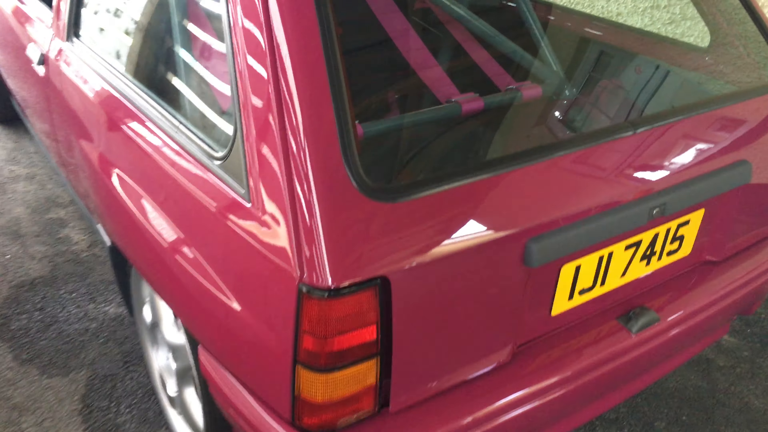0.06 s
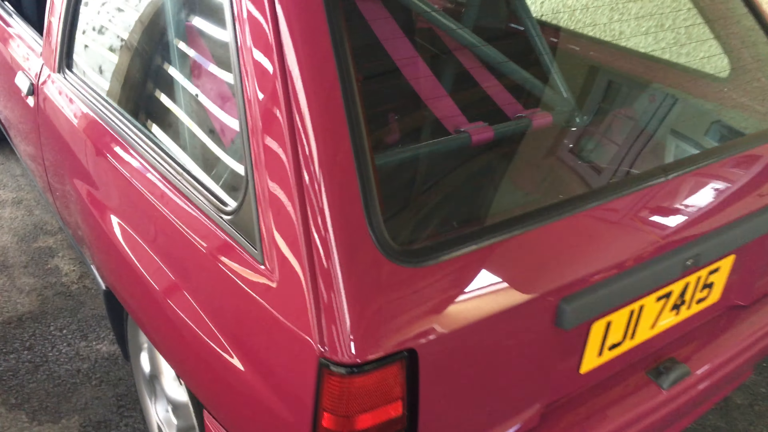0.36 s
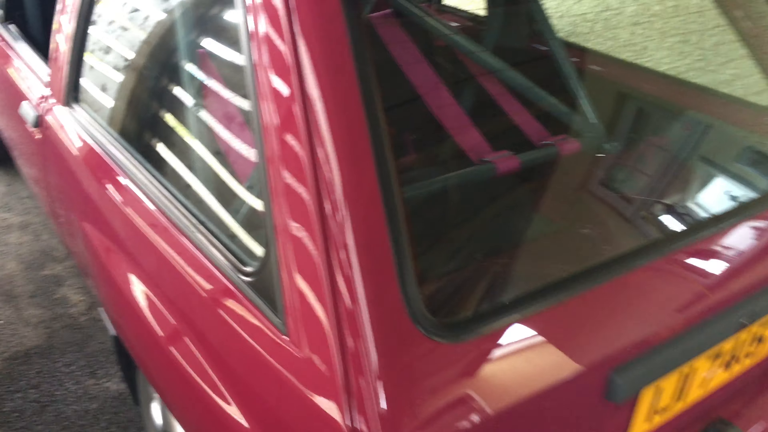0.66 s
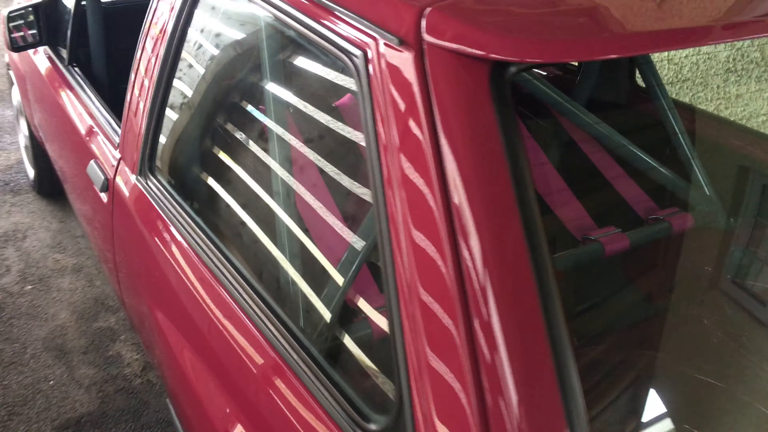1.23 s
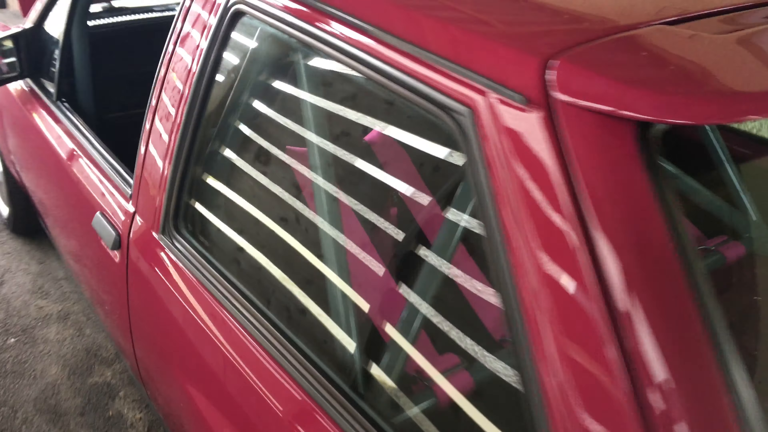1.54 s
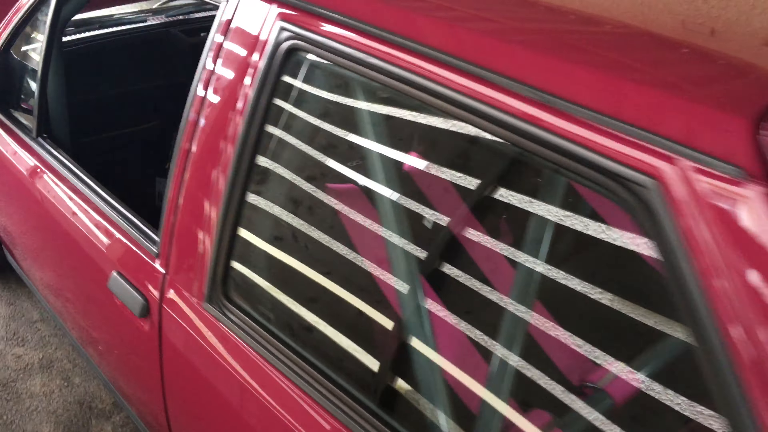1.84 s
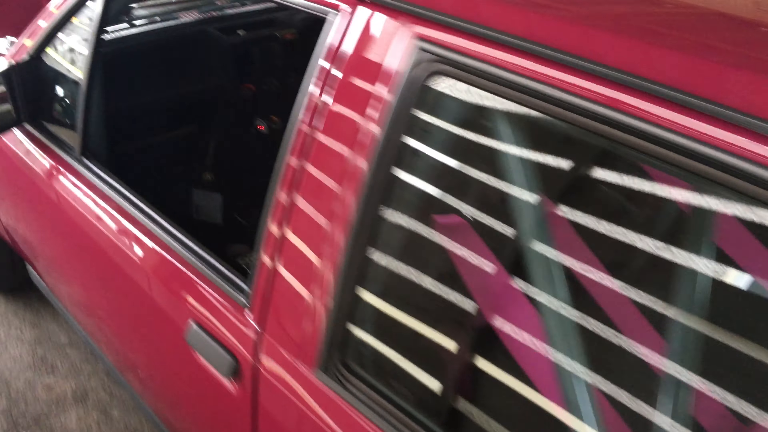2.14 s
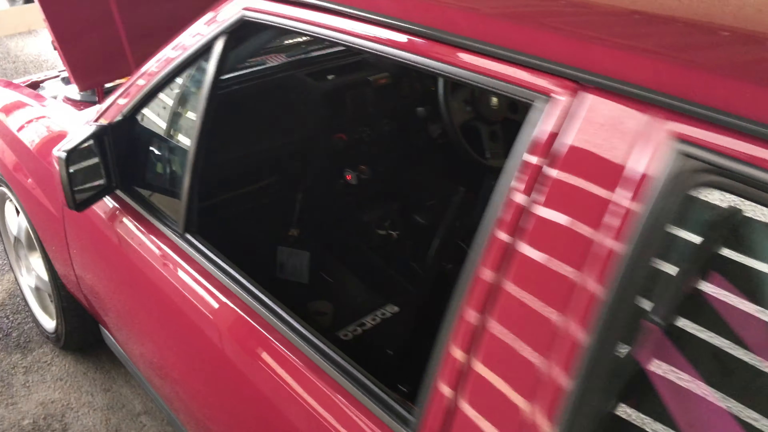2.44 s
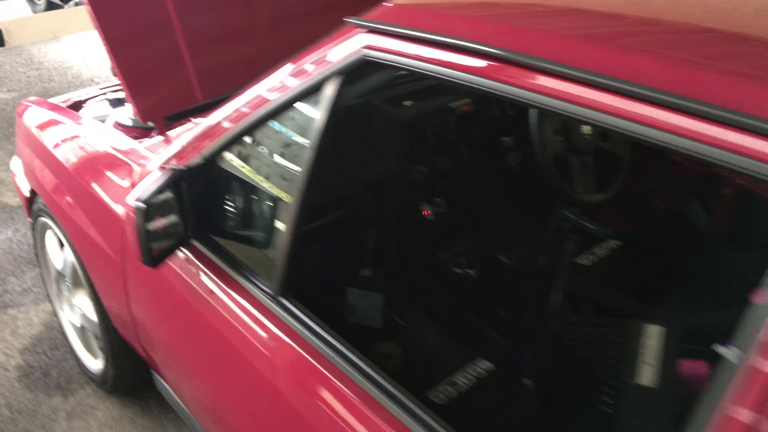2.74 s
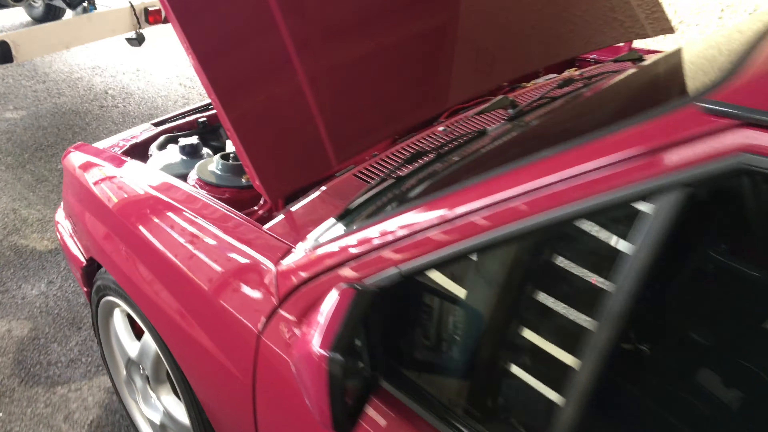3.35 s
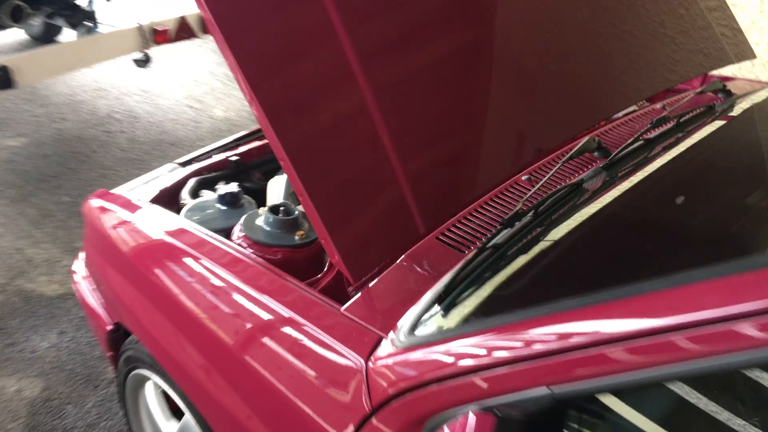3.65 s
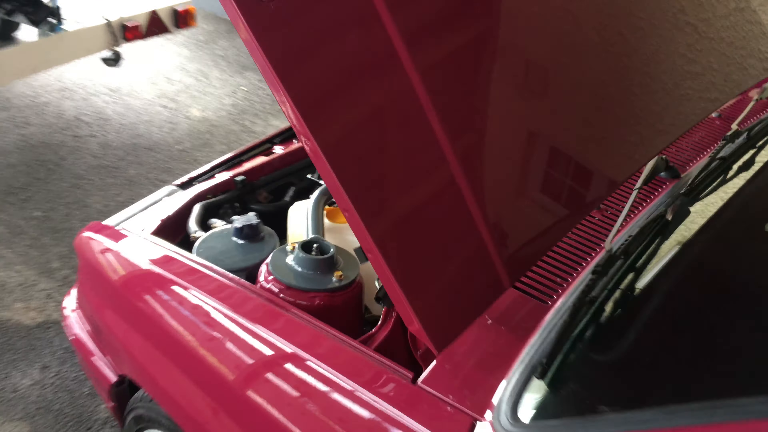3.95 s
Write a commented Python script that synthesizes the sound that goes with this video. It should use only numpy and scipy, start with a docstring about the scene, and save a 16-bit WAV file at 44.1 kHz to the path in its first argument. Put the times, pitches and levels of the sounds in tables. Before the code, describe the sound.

A four-cylinder petrol car idles in a garage, droning and chuffing unevenly over a rumble and faint valve ticks. The microphone travels from rear to engine bay, where the cooling fan's whirr and a belt whine come forward.

```python
"""A garage, where a four-cylinder petrol engine idles, hunting slowly, with its radiator fan running.
The exhaust drones on the firing rate, and uneven firings make the pipe chuff and burble.
Behind it the block rumbles, the valves tick, a belt drive whines and the fan blades chop the air.
We walk from the tailpipe to the open bonnet: the drone thins, the fan's whine and rush grow."""
import sys
import numpy as np
from scipy import signal
from scipy.fft import rfft, irfft, next_fast_len
from scipy.io import wavfile
from scipy.ndimage import uniform_filter1d, map_coordinates

SR = 44100
rng = np.random.default_rng(int(sys.argv[2]) if len(sys.argv) > 2 else 0)


def store_pcm(level_fs):
    """Save levels as 16-bit WAV."""
    pcm = np.round(np.clip(level_fs, -1, 1) * 32767).astype(np.int16)
    wavfile.write(sys.argv[1], SR, np.atleast_2d(pcm).T)


N = 176400

# narrow swells in the rush (time [s], pitch [Hz], length [s], level [dB], half-width [ratio])
WHIRR_SWELLS = [(.36, 1705, .14, -42, .024), (2.54, 930, 0.29, -43, 0.0076),
                (3.351, 1588, 0.25, -38.5, .022)]
# thin ring from the engine bay, likely a bearing (pitch [Hz], relative level [dB])
BEARING_TONES = [(4226, 0.5), (4608, 0.5), (5033, -5), (5410, 1)]
# fader for that ring (time [s], level [dB])
BEARING_FADER = [(0, -72), (3.15, -66), (3.38, -59), (3.62, -66), (4, -64)]
# belt-driven whine, likely the alternator (time [s], level [dB])
ALTERNATOR_FADER = [(0, -47.5), (.8, -56), (1.1, -46), (1.5, -47), (1.7, -53), (1.92, -40.5), (2.2, -51),
                    (2.75, -46), (3.2, -55), (3.45, -48), (3.56, -39.5), (3.78, -41), (4, -52)]
# colour of the block's rumble (frequency [Hz], gain [dB])
RUMBLE_EQ = [(15, -21), (45, 3), (62, 12), (76, 3.5), (92, 14.5), (112, 4), (160, 5.5), (240, -2.5),
             (355, -1.5), (430, -11.5), (700, -20), (1200, -49.5)]
# rumble along the walk (time [s], level [dB])
RUMBLE_FADER = [(0, -30.5), (1.3, -27.5), (1.8, -32), (2.9, -30.5), (4, -31.5)]
# colour of the valve ticks (frequency [Hz], gain [dB])
TICK_EQ = [(600, -26), (1200, 0), (2000, 0), (3200, -10), (7000, -27.5), (14000, -36)]
# pace of the fan shaft (time [s], speed [turns/s])
FAN_SHAFT = [(0, 38), (1, 38), (2, 38.3), (3.3, 38.46), (4, 38.6)]
# blade harmonics 1, 3, 4 and 5 (pitch [multiple of shaft speed])
BLADE_MULTIPLES = [10, 30, 40, 50]
# blade whine along the walk (time [s], then for each blade harmonic: level [dB])
BLADE_FADERS = [(0, -52, -54, -55, -55), (0.45, -50.5, -43, -40.5, -56), (0.85, -48.5, -49, -60, -45.5),
                (1.2, -50, -50, -49, -52.5), (1.6, -48, -39.5, -52, -41.5), (2.0, -49, -46.5, -44.5, -55),
                (2.35, -48, -38.5, -44, -49), (2.7, -37.5, -51, -43, -52), (3.0, -45, -35.5, -45.5, -38.5),
                (3.35, -44.5, -45.5, -40.5, -51), (3.65, -45, -38.5, -51, -43), (3.85, -37, -45, -44, -60),
                (4, -41, -51, -47, -58)]
# weaker fan tones (pitch at nominal speed [Hz], mid-walk level [dB])
SHAFT_TONES = [(767, -54), (1880, -49.5), (2342, -65), (3110, -60.5)]
# air rush of fan and belts, before trim (time [s], body level [dB], hiss level [dB])
RUSH_FADERS = [(0.0, -36, -51), (0.44, -35.5, -50.5), (0.6, -36.5, -51.5), (1.19, -36.5, -50),
               (1.57, -35, -49.5), (1.82, -35, -49.5), (2.73, -33.5, -47.5), (2.9, -33.5, -46.5),
               (3.2, -33, -47), (3.6, -33, -45.5), (4.0, -32, -45.5)]
# colour of the rush's body (frequency [Hz], gain [dB])
BODY_EQ = [(260, -25), (450, -13.5), (574, -14.5), (670, -8.5), (876, -7), (1120, -4.5), (1400, -6.5),
           (1520, -4.5), (1790, -6), (1940, -3.5), (2200, -11), (2520, -11), (3140, -23.5), (4080, -54),
           (6910, -120)]
# colour of its hiss (frequency [Hz], gain [dB])
HISS_EQ = [(1500, -28), (2800, -3.5), (3300, 4.5), (3650, 0), (4400, 0.5), (4900, -3.5), (5600, -3),
           (6800, -4.5), (7700, -7.5), (9400, -10), (10400, -17), (11200, -14.5), (13500, -18.5),
           (15700, -24)]
# exhaust pipe resonances (frequency [Hz], width [Hz], gain [dB])
PIPE_MODES = [(88.3, 11.7, 27), (160, 17, -9), (190, 11, -10)]
# uneven firings that make the pipe boom (time [s], peak level of the fundamental [dB])
CHUFF_CUES = [(0.185, -15), (0.282, -15.5), (0.377, -17), (0.452, -17.2), (0.495, -19), (0.716, -18),
              (0.842, -18.7), (1.035, -14.5), (1.12, -16.5), (1.239, -15.5), (1.372, -17), (1.447, -15.4),
              (1.778, -13.5), (2.229, -18.2), (2.289, -23), (2.504, -17.5), (2.59, -18.5), (2.831, -14.1),
              (2.962, -17.8), (3.381, -16)]
# the hunting idle (time [s], rate [firings/s])
FIRING_RATE = [(0.0, 36.62), (0.15, 36.5), (0.45, 38.4), (0.7, 38.3), (1.0, 37.5), (1.25, 36.51), (1.5, 37),
               (1.8, 38), (2.05, 38.5), (2.3, 38), (2.55, 38.2), (2.8, 36.67), (3.05, 36.4), (3.3, 37.1),
               (3.55, 37.8), (3.8, 38.05), (4.0, 38)]
# drone harmonics (pitch [multiple of firing rate])
DRONE_HARMONICS = [1, 2, 3, 4, 5, 6, 8]
# drone along the walk (time [s], then for each harmonic: level [dB])
DRONE_FADERS = [(0, -32, -15.5, -23.5, -27, -38, -31.5, -51.2),
                (0.3, -28.6, -15, -26, -26, -29.5, -35, -40.5),
                (0.65, -26.5, -12.5, -26.6, -26.7, -27, -39.5, -35),
                (1.25, -26, -16.5, -29, -29, -39.5, -33, -42),
                (1.55, -28.7, -15, -29, -29, -36, -39, -44.6),
                (1.85, -28.7, -12, -26, -28.5, -31, -41.5, -55),
                (2.15, -30.2, -13.5, -30, -28.5, -33, -40, -55),
                (2.7, -27.7, -22.0, -24, -37, -33, -42, -51.0),
                (3.6, -31.2, -18, -23, -49, -29.5, -47, -47.2),
                (4, -35, -17.2, -24.5, -39, -28, -39, -49.4)]

FADE_DB = 2  # tones swell and fade through the room's standing waves
TICK_DB, TICK_DECAY_S = -54, 0.0027
FAN_NOMINAL_HZ, FAN_WANDER, FAN_FLUTTER_RAD = 38.31, 0.00078, 0.045
BLADES, CHOP_DEPTH, WHINE_WAVER_DB = 10, 0.05, 1.05
BODY_TRIM_DB, HISS_TRIM_DB = -0.65, 0.48
GARAGE_T60_S, GARAGE_WET_DB = 0.32, -5.5
SILENCER_HZ, TAILPIPE_HZ = 180, 46
BURBLE_DB, BURBLE_JITTER_S = -31, 0.0008
CHUFF_HZ, CHUFF_SWELL_S, CHUFF_OCTAVE_DB = 90.6, 0.021, -20.5
DRONE_WAVER_DB, CYLINDER_SWING_DB, ODD_LAG_RAD = 0.7, 1, 1.0
FIRST_FIRING_S, TOP_HZ = 0.023, 15800


def amp(db):
    """Decibels to gain."""
    return 10 ** (np.asarray(db) / 20)


def unit(x):
    """Scale to rms 1."""
    return x / np.sqrt(np.mean(x ** 2) + 1e-20)


def curves(rows):
    """Automation: one value per sample for each column after the time."""
    times, *columns = np.transpose(rows)
    return [np.interp(np.arange(N) / SR, times, column) for column in columns]


def wobble(rate):
    """A smooth random curve, rate knots a second."""
    return map_coordinates(rng.standard_normal(200), [np.arange(N) * rate / SR], mode="mirror")


def filtered(x, response):
    """Filter x by a complex response of frequency."""
    size = next_fast_len(N + SR // 2)
    return irfft(rfft(x, size) * response(np.fft.rfftfreq(size, 1 / SR)), size)[:N]


def drifting_noise(eq, patchy_db):
    """Coloured noise of rms 1 with drifting patches of gain, as when walking past walls."""
    spectra = signal.stft(rng.standard_normal(N), nperseg=2048)[2]
    patches = uniform_filter1d(rng.standard_normal(spectra.shape), size=5, axis=0)  # across frequency
    patches = uniform_filter1d(patches, size=14, axis=1)  # across time
    noise = signal.istft(spectra * amp(patchy_db * unit(patches)), nperseg=2048)[1][:N]
    hz, db = np.transpose(eq)
    return unit(filtered(noise, lambda f: amp(np.interp(np.log(f + 1), np.log(hz), db))))


def garage(x):
    """The sound with the short boom of the walls after it."""
    t = np.arange(SR // 2) / SR
    tail = rng.standard_normal(len(t)) * amp(-60 * t / GARAGE_T60_S)
    return x + amp(GARAGE_WET_DB) * signal.fftconvolve(x, tail / np.linalg.norm(tail))[:N]


def whirrs():
    """Narrow bands of the rush swell and fade as we move."""
    t = np.arange(N) / SR
    out = np.zeros(N)
    for at, hz, length, db, width in WHIRR_SWELLS:
        band = filtered(rng.standard_normal(N), lambda f: 1 / (1 + ((f / hz - 1) / width) ** 2))
        swell = np.exp(-2 * ((t - at) / length) ** 2)
        out += amp(db) * swell * unit(band)
    return out


def belt(firings, cycles_per_firing=28.23):
    """A belt-driven whine rides the idle speed; a thin ring swells at the open bonnet."""
    t = np.arange(N) / SR
    whine = np.sin(2 * np.pi * cycles_per_firing * firings + 0.5 * wobble(30))
    ring = sum(amp(db + FADE_DB * wobble(5.94)) * np.sin(2 * np.pi * hz * t + 1.6 * wobble(160))
               for hz, db in BEARING_TONES)
    return np.sqrt(2) * (amp(curves(ALTERNATOR_FADER)[0]) * whine + amp(curves(BEARING_FADER)[0]) * ring)


def engine_block(firings):
    """A bed of block rumble, with a soft valve tick on each firing."""
    since_firing_s = firings % 1 / curves(FIRING_RATE)[0]
    ticks = unit(np.exp(-since_firing_s / TICK_DECAY_S) * drifting_noise(TICK_EQ, patchy_db=5))
    rumble = amp(curves(RUMBLE_FADER)[0]) * drifting_noise(RUMBLE_EQ, patchy_db=1.5)
    hiss_db = curves(RUSH_FADERS)[1]  # the ticks come closer along with the hiss
    return rumble + amp(TICK_DB + hiss_db - hiss_db.mean()) * ticks


def fan_tone(turns, multiple):
    """A tone of rms 1 riding the fan shaft; higher multiples flutter more."""
    phase = 2 * np.pi * (multiple * turns + rng.random())
    return np.sqrt(2) * np.sin(phase + FAN_FLUTTER_RAD * np.sqrt(multiple) * wobble(25.1))


def fan():
    """The radiator fan: blade whine, weaker shaft tones, and a rush of air chopped by the blades."""
    turns = np.cumsum(curves(FAN_SHAFT)[0] * (1 + FAN_WANDER * wobble(7))) / SR
    body_db, hiss_db = curves(RUSH_FADERS)
    whine = sum(amp(db + WHINE_WAVER_DB * wobble(14)) * fan_tone(turns, multiple)
                for multiple, db in zip(BLADE_MULTIPLES, curves(BLADE_FADERS)))
    shaft = sum(amp(db) * unit(amp(FADE_DB * wobble(4.02))) * fan_tone(turns, hz / FAN_NOMINAL_HZ)
                for hz, db in SHAFT_TONES)
    closeness = amp(body_db - body_db.mean())
    body = amp(body_db + BODY_TRIM_DB) * drifting_noise(BODY_EQ, patchy_db=2)
    hiss = amp(hiss_db + HISS_TRIM_DB) * drifting_noise(HISS_EQ, patchy_db=2)
    chop = 1 + CHOP_DEPTH * np.sin(2 * np.pi * BLADES * turns)
    return whine + closeness * shaft + chop * (body + hiss)


def pipe(f):
    """Exhaust response: the pipe rings, the silencer rounds off the top, the mouth radiates little sub."""
    ring = sum(amp(db) * 1j * f * width / (hz * hz - f * f + 1j * f * width)
               for hz, width, db in PIPE_MODES)
    return ring / (1 + (f / SILENCER_HZ) ** 4) / (1 + (TAILPIPE_HZ / (f + 1)) ** 6)


def burble(firings):
    """No two firings are alike; each small irregularity rings the pipe."""
    starts = np.flatnonzero(np.diff(np.floor(firings)))
    strength, jitter = rng.standard_normal((len(starts), 2)).T
    starts += (jitter * BURBLE_JITTER_S * SR).astype(int)
    kicks = np.zeros(N)
    kicks[np.clip(starts, 0, N - 1)] = amp(BURBLE_DB) * strength
    ring_peak = np.abs(filtered(signal.unit_impulse(N), pipe)).max()
    return filtered(kicks, pipe) / ring_peak


def chuffs():
    """A markedly uneven firing makes the pipe boom for a few cycles."""
    t = np.arange(-SR // 10, SR // 10) / SR
    phase = 2 * np.pi * CHUFF_HZ * t
    swell = np.exp(-(t / CHUFF_SWELL_S) ** 2)
    boom = swell * (np.cos(phase) + amp(CHUFF_OCTAVE_DB) * np.cos(2 * phase))
    out = np.zeros(N + len(t))
    for at, db in CHUFF_CUES:
        out[round(at * SR):][:len(t)] += amp(db) * boom
    return out[len(t) // 2:][:N]  # each boom crests on its cue


def drone(firings):
    """The regular exhaust beat: harmonics of the firing rate, the even ones cresting at each firing."""
    tones = np.zeros(N)
    for k, db in zip(DRONE_HARMONICS, curves(DRONE_FADERS)):
        lag = ODD_LAG_RAD * (k - 1) * (k % 2)  # odd overtones trail the even ones
        tones += amp(db + DRONE_WAVER_DB * wobble(12)) * np.cos(2 * np.pi * k * firings - lag)
    lope = amp(CYLINDER_SWING_DB * np.cos(2 * np.pi * firings / 4))  # strong and weak cylinders
    return lope * tones


def scene():
    """The idle speed drives drone, burble, ticks and belt; the electric fan keeps its own pace."""
    rate = curves(FIRING_RATE)[0]
    firings = np.cumsum(rate) / SR + 1 - FIRST_FIRING_S * rate[0]  # a whole number at each firing
    exhaust = drone(firings) + chuffs() + garage(burble(firings))
    return (exhaust + engine_block(firings) + belt(firings) + fan() + whirrs())[None]


def record(dry):
    """A brick-wall high cut on the mix."""
    return filtered(dry[0], lambda hz: hz < TOP_HZ)[None]


dry = scene()
out = record(dry)
store_pcm(out)
```